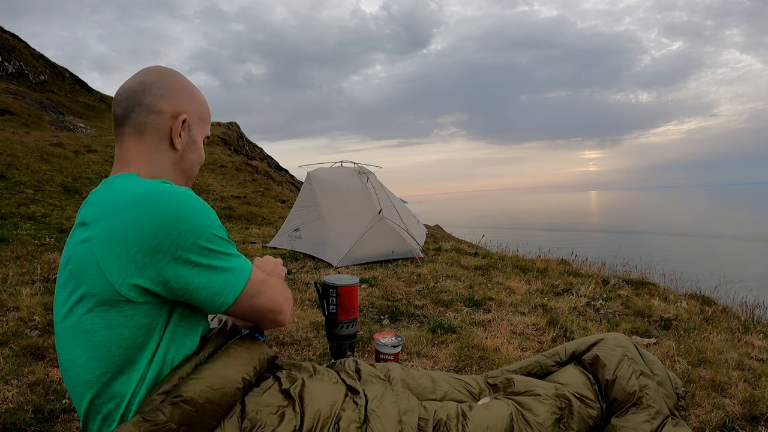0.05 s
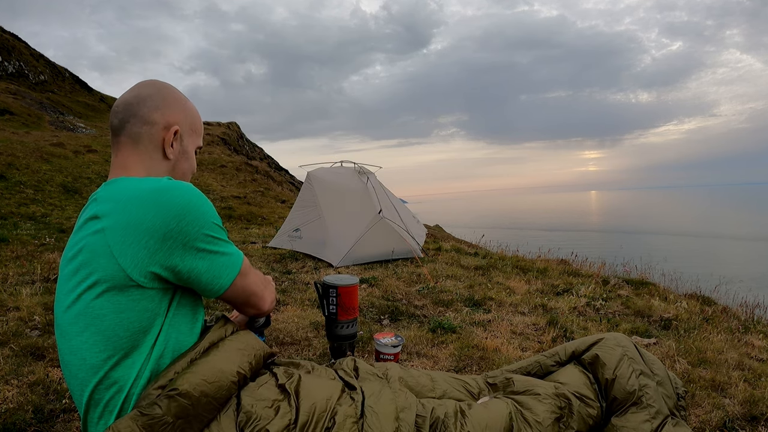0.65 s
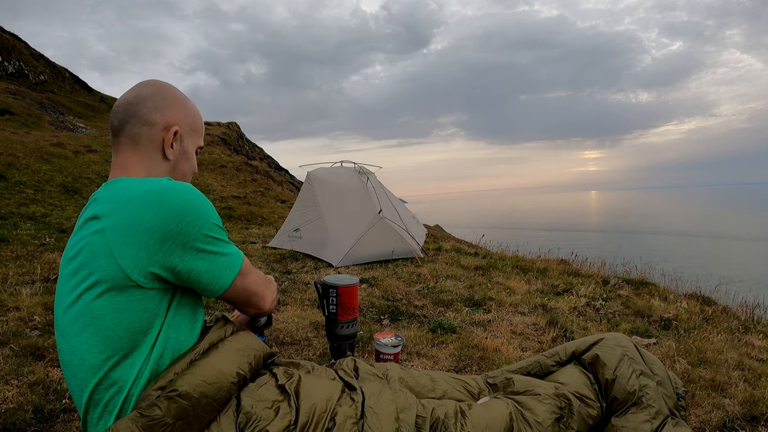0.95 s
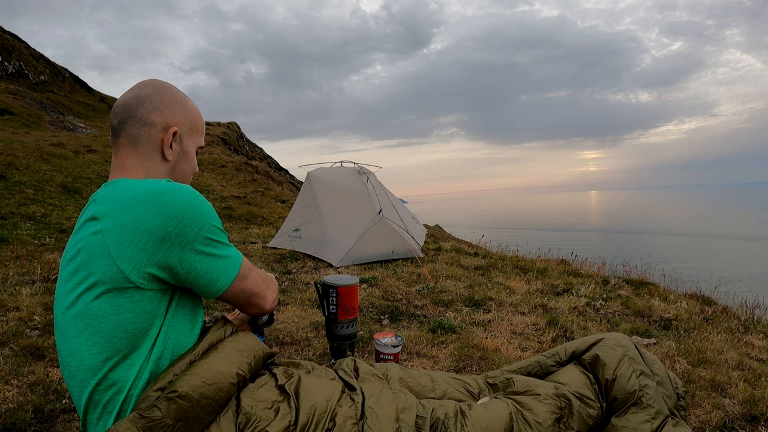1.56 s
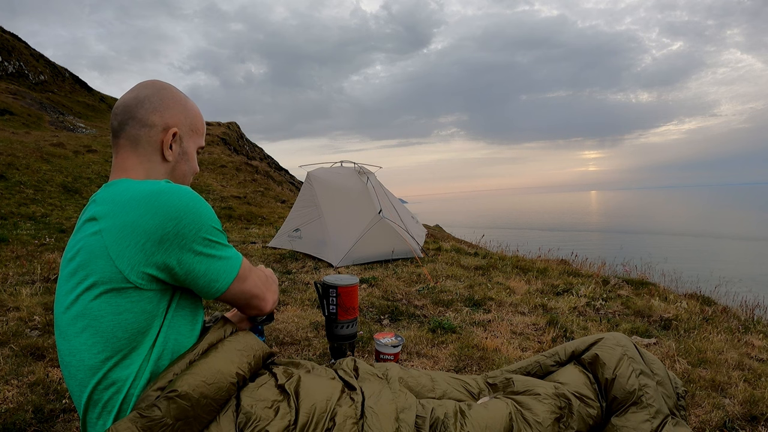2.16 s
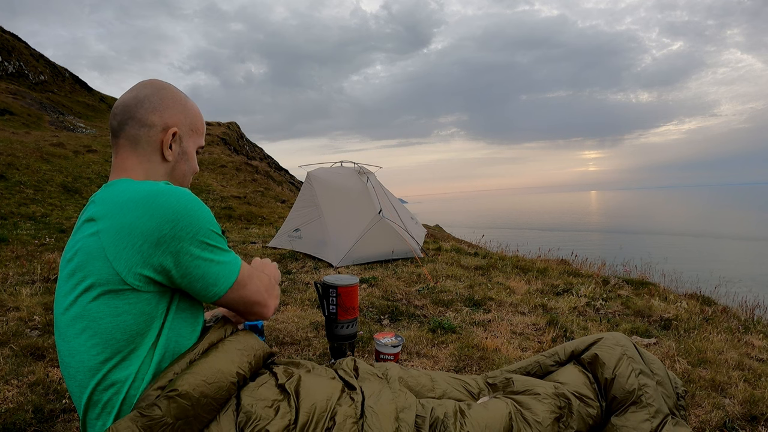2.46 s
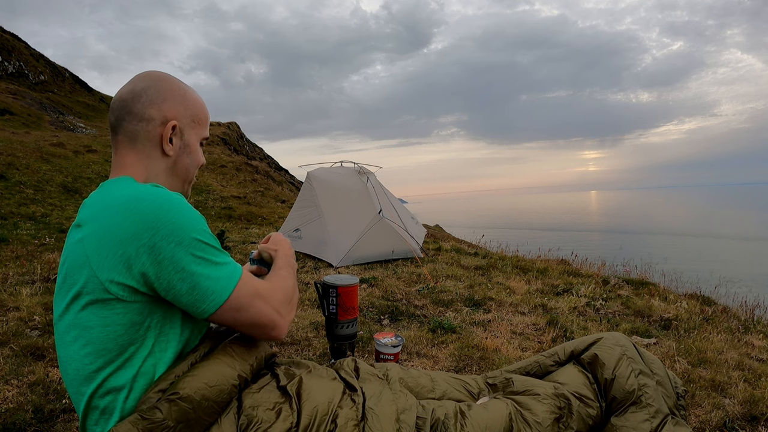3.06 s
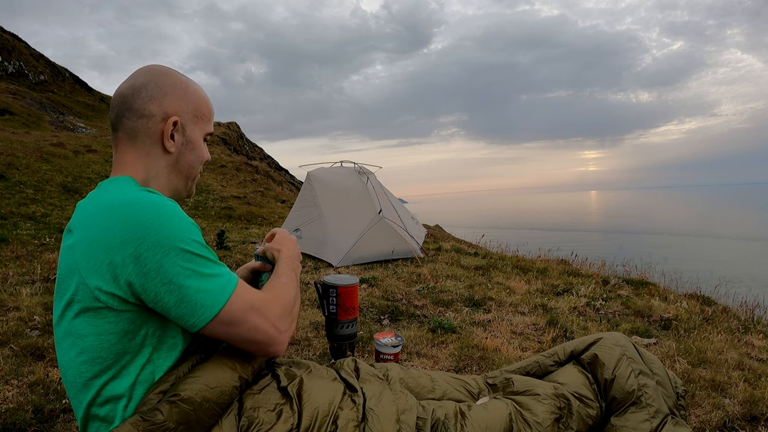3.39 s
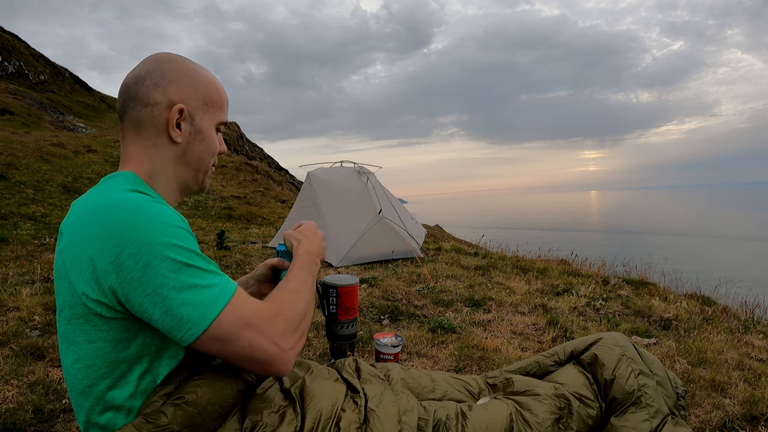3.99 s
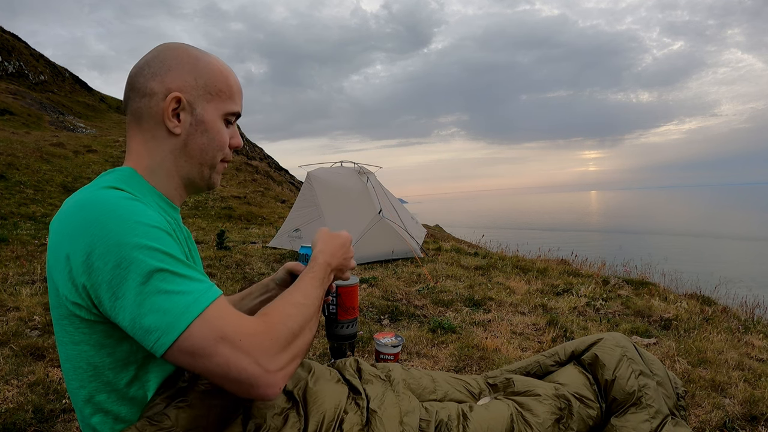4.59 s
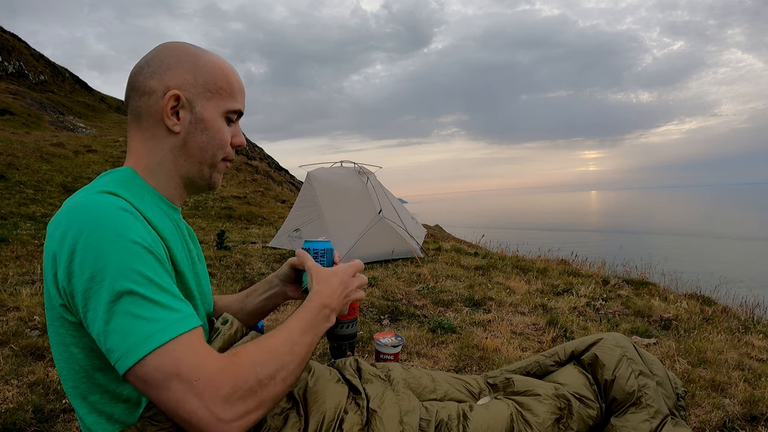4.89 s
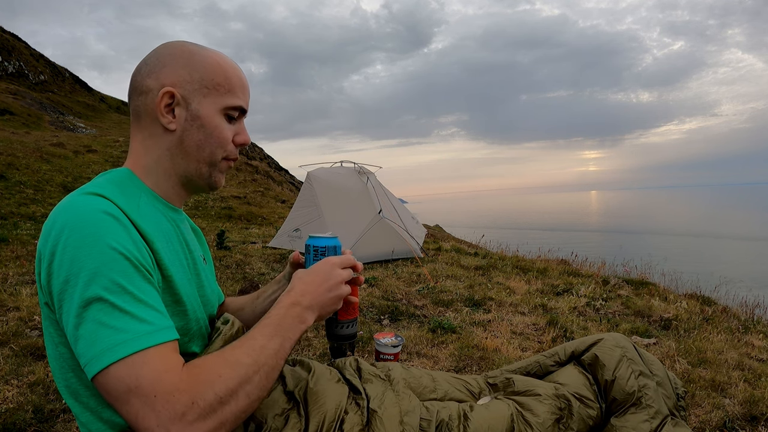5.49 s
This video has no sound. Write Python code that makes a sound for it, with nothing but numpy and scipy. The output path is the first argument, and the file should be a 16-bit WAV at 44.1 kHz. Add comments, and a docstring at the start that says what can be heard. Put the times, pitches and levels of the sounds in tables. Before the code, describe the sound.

A camping stove burns nearby on an open clifftop throughout, a soft, steady gas hiss over a low flame rumble. Wind buffets the microphone, strongest in the first half second, then easing with a few smaller gusts. At about 0.8 seconds, very close, a beer can's seal cracks sharply and gas sighs out briefly. The tab ticks faintly at 1.5 seconds. From 2.1 seconds it ticks faster with another tiny hiss, and the lid tears open in a quick, loud run of metallic cracks ending near 2.3 seconds. Fingers tap the can lightly at 2.5, 3.5 and 4.1 seconds. The thin metal snaps loudly at 4.4 seconds, followed by a faint tick and tap, then a smaller ringing snap at 5.5 seconds. In the second half, a faint, dull rush like distant surf slowly swells.

```python
"""On a clifftop, beside a burning camping stove, a beer can is opened close to the microphone.
The tab cracks the seal, gas sighs through the slit, the tab ticks under strain, the lid tears open in a
quick run, and the thin shell rings as it snaps and is tapped under the fingers. The stove's jet hisses
over its rumbling flame throughout; wind buffets the microphone and dies down as a distant rush swells."""
import sys
import numpy as np
from scipy import signal
from scipy.fft import rfft, irfft, next_fast_len
from scipy.io import wavfile
from scipy.ndimage import uniform_filter1d, map_coordinates

SR = 44100
rng = np.random.default_rng(int(sys.argv[2]) if len(sys.argv) > 2 else 0)


def waveform_to_disk(signal):
    """Save audio, clipped to [-1, 1], as 16-bit WAV at the path in sys.argv[1]."""
    frames = np.transpose(np.atleast_2d(signal))
    scaled = np.clip(frames, -1, 1) * 32767
    samples = np.round(scaled).astype(np.int16)
    wavfile.write(sys.argv[1], SR, samples)


N = 244314
TIME = np.arange(N) / SR


def amp(db):
    return 10 ** (np.asarray(db) / 20)


def unit(x):
    return x / np.sqrt(np.mean(x ** 2) + 1e-20)


def along(points, hz):
    """Interpolate (Hz, value) points on a log frequency axis."""
    pitches, values = np.transpose(points)
    return np.interp(np.log(hz + 1), np.log(pitches + 1), values)


def curves(rows):
    """One value per sample for each column after the time."""
    times, *columns = np.transpose(rows)
    return [np.interp(TIME, times, column) for column in columns]


def wobble(rate):
    """A smooth random curve with rate knots a second."""
    knots = rng.standard_normal(int(N * rate / SR) + 4)
    return map_coordinates(knots, [TIME * rate])


def filtered(x, response):
    """Pass x through a complex response of frequency."""
    size = next_fast_len(N + SR // 2)
    hz = np.fft.rfftfreq(size, 1 / SR)
    return irfft(rfft(x, size) * response(hz), size)[..., :N]


def causal(gain):
    """The response with this gain that rings only after the blow."""
    cepstrum = irfft(np.log(np.maximum(gain, 1e-6)))
    half = len(cepstrum) // 2
    return np.exp(rfft(np.r_[cepstrum[0], 2 * cepstrum[1:half], np.zeros(half)]))


def panned(x, left_db):
    """Make the left channel left_db louder than the right."""
    return x * amp([[left_db / 2], [-left_db / 2]])


def rush(gain, patchy_db):
    """Stereo noise of rms 1, coloured by gain(Hz), with patches of random strength."""
    # How alike the microphone's two sides are. Each row: frequency in Hz, correlation.
    likeness = [(60, 0.93), (130, .98), (290, 0.84), (640, 0.75), (1400, 0.9), (3100, 0.73), (5500, 1),
                (8000, .95), (12000, .65), (15000, .5)]

    def colour_and_width(hz):
        angle = np.arccos(np.clip(along(likeness, hz), -1, 1)) / 2
        return gain(hz) * np.array([np.cos(angle), np.sin(angle)])

    spectra = signal.stft(rng.standard_normal((2, N)), nperseg=512)[2]
    patches = uniform_filter1d(rng.standard_normal(spectra.shape[1:]), size=6, axis=0)
    patches = unit(uniform_filter1d(patches, size=16, axis=1))
    noise = signal.istft(spectra * amp(patchy_db * patches), nperseg=512)[1][:, :N]
    mid, side = filtered(noise, colour_and_width)
    return unit(np.array([mid + side, mid - side]))


def broad_rush(spectrum, patchy_db):
    """Noise with a broad spectrum. Each row: frequency in Hz, relative level in dB."""
    return rush(lambda hz: amp(along(spectrum, hz)), patchy_db)


def resonant_rush(modes, patchy_db):
    """Noise driving independent resonances. Each row: centre in Hz, width in Hz, relative level in dB."""
    def gain(hz):
        peaks = (amp(db) / (1 + (2 * (hz - centre) / width) ** 2) for centre, width, db in modes)
        return np.sqrt(sum(peak ** 2 for peak in peaks))
    return rush(gain, patchy_db)


def distant_rush():
    """Far off, a dull, even rush, as of surf under the cliff, slowly swells."""
    # Colour of the rush. Each row: frequency in Hz, relative level in dB.
    spectrum = [(150, -5.5), (300, 5), (450, -1.5), (650, 5.5), (900, 2), (1300, 2.5), (1800, -15),
                (3000, -64), (6000, -57)]
    swell = amp(-76 + 4 * TIME)
    return panned(swell * broad_rush(spectrum, patchy_db=0.9), left_db=-3)


def wind():
    """A dying breeze and a few bell-shaped gusts buffet the microphone, the right side a little harder."""
    # Rumble of eddies on the microphone. Each row: frequency in Hz, relative level in dB.
    spectrum = [(10, -9), (28, -0.5), (42, 0), (65, -13), (100, -13), (160, -40), (400, -70)]
    # The gusts. Each row: time of the peak in seconds, length in seconds, level in dB.
    gust_peaks = [(0.01, 0.055, -35.5), (0.16, 0.067, -28.5), (0.266, 0.03, -31), (0.732, 0.14, -36),
                  (1.27, 0.11, -41), (1.525, 0.086, -36.5), (2.987, 0.076, -43.5), (3.203, 0.12, -42),
                  (3.703, 0.049, -39)]
    breeze = amp(-44.5 - 2.5 * TIME + 1.5 * wobble(22.25))
    gusts = sum(amp(db) * np.exp(-2 * ((TIME - peak) / length) ** 2) for peak, length, db in gust_peaks)
    eddies = broad_rush(spectrum, patchy_db=4.5)
    power = np.abs(uniform_filter1d(np.mean(eddies ** 2, axis=0), size=4001))
    even_eddies = eddies / np.sqrt(power + 0.028)  # so that breeze and gusts set the strength
    return panned(np.hypot(breeze, gusts) * even_eddies, left_db=-2.8)


def stove():
    """Nearby, the gas jet hisses and rings the burner's resonances, above the low roar of the flame."""
    # Resonances of jet and mixing tube, then the burner's upper ones.
    # Each row: centre in Hz, width in Hz, relative level in dB.
    tube_modes = [(1192, 430, -13), (4300, 530, -8), (4600, 490, -8.5), (5493, 336, 1), (6004, 340, -2.5)]
    whistle_modes = [(7320, 770, 0), (8040, 960, -6.5), (9600, 570, -9), (11360, 490, -12),
                     (14200, 600, -27)]
    # Colours of jet and flame. Each row: frequency in Hz, relative level in dB.
    jet_spectrum = [(200, -27), (600, -19), (850, -33.5), (1500, -25.5), (2000, -27), (2800, -22.5),
                    (3400, -25.5), (6600, -21.5), (9000, -24), (10300, -23.5), (10850, -28), (12500, -30.5),
                    (13200, -32.5), (14400, -50), (15300, -49)]
    flame_spectrum = [(30, -33), (80, -1), (120, -3), (160, 1), (200, -2), (255, -11), (320, -11.5),
                      (430, -22), (700, -32.5), (1500, -88)]
    # The burn drifts. Each row: time in seconds, tube and flame levels in dB before their trims.
    burn_drift = [(0.0, -48, -55.5), (0.66, -48.5, -53.5), (0.99, -49, -55), (1.62, -46.5, -53.5),
                  (2.13, -46.5, -53), (2.33, -47.5, -51), (2.65, -47, -54.5), (3.87, -46.5, -50.5),
                  (4.18, -47, -51), (4.35, -50.5, -53), (5.26, -48.5, -50.5), (5.54, -51, -52)]
    # The treble drifts. Each row: time in seconds, level in dB before its trim.
    treble_drift = [(0.0, -56), (0.46, -55), (0.59, -56.5), (0.82, -57), (0.94, -56.5), (1.34, -53),
                    (1.6, -55.5), (2.17, -54), (2.31, -52.5), (2.45, -56), (2.7, -55.5), (2.87, -55.5),
                    (3.56, -54), (4.03, -51), (4.84, -55), (5.14, -52.5), (5.25, -55), (5.54, -56.5)]
    # The hiss changes colour. Each row: time in seconds, lower and upper midrange levels in dB.
    mid_drift = [(0.0, -73, -61.5), (0.7, -66, -68), (1.1, -63.5, -70), (1.6, -63, -66), (2.1, -62.5, -64),
                 (2.6, -61.5, -62), (2.95, -69, -59.5), (3.35, -75, -60), (3.9, -71, -66.5),
                 (4.3, -65, -63), (4.9, -75, -63), (5.54, -68, -65.5)]
    tube_db, flame_db = curves(burn_drift)
    treble_db, = curves(treble_drift)
    lower_db, upper_db = curves(mid_drift)
    jet_db = -53.5 + 0.5 * (treble_db - treble_db.mean())  # follows half of the treble's swing
    ring = amp(tube_db + 1.5) * resonant_rush(tube_modes, patchy_db=1)
    whistle = amp(treble_db - 0.5) * resonant_rush(whistle_modes, patchy_db=0.5)
    jet = amp(jet_db) * broad_rush(jet_spectrum, patchy_db=1)
    mids = amp(lower_db) * resonant_rush([(2020, 940, 0)], patchy_db=1.5)
    mids += amp(upper_db) * resonant_rush([(3000, 1560, 0)], patchy_db=1.5)
    flame = amp(flame_db + 3.5) * broad_rush(flame_spectrum, patchy_db=1)
    gas_flutter = amp(0.47 * wobble(20))
    hiss = gas_flutter * (ring + whistle + jet + mids)
    return panned(hiss, left_db=-0.4) + panned(flame, left_db=-1)


def escaping_gas():
    """Gas hisses through the slit in the lid and sounds the hollow head space until the lid is open."""
    # Resonances of the slit and of the gas above the beer.
    # Each row: centre in Hz, width in Hz, relative level in dB.
    slit_modes = [(1870, 1700, 1), (3820, 790, 6), (4970, 1000, 3), (6900, 2300, 6), (8400, 1200, -11),
                  (10640, 990, 3.5), (12600, 1800, -4.5)]
    head_space = [(1490, 220, 0)]
    # Each time the seal gives. Each row: start in seconds, hold in seconds, level of the hiss in dB.
    leaks = [(0.776, 0.23, -47.5), (2.135, 0.12, -53)]
    attack_s, sag_db_per_s = 0.015, 10  # the pressure sags while the slit stays open
    open_s, empty_s = 2.26, 0.02  # the flap gives way; time for the last pressure to go

    def flow(fade_db_per_s):
        total = np.zeros(N)
        for start, hold, db in leaks:
            age = TIME - start
            sag_db = sag_db_per_s * np.clip(age, 0, hold)
            fade_db = fade_db_per_s * np.maximum(age - hold, 0)
            total += np.clip(age / attack_s, 0, 1) * amp(db - sag_db - fade_db)
        return total

    pressure = np.clip(1 - (TIME - open_s) / empty_s, 0, 1)
    hiss = flow(fade_db_per_s=132) * resonant_rush(slit_modes, patchy_db=1.5)
    hollow = flow(fade_db_per_s=62) * resonant_rush(head_space, patchy_db=0)
    flutter = amp(0.97 * wobble(71.4))
    return pressure * flutter * (hiss + amp(-6.5) * hollow)


def shell_ring(force, hz, drive_db):
    """A force rings the can's aluminium wall, which hand and beer damp."""
    # Modes of the shell. Each row: centre in Hz, width in Hz, relative level in dB.
    modes = [(1160, 680, 1), (1520, 400, 5.5), (1930, 120, -1), (2740, 440, -3.5), (3280, 440, 0.5),
             (4025, 490, 5), (5230, 210, 3), (5200, 740, 0.5), (6040, 390, 1), (7090, 280, 3),
             (7700, 650, -2.5), (9250, 470, -9), (9800, 220, -3.5), (11600, 120, -9)]
    travel_s, lap_s, direct_share = 0.0004, 0.00045, 0.45
    power = sum(amp(db) ** 2 / (1 + (hz / width - centre ** 2 / (width * (hz + 1))) ** 2)
                for centre, width, db in modes)
    # Bending waves run slower at low pitch, which spreads the blow; travel_s holds at 1 kHz.
    bending = np.exp(-4j * np.pi * travel_s * np.sqrt(hz * 1000))
    # Part of the wave is heard at once; the rest circles the can a few times first.
    lap = np.exp(-2j * np.pi * hz * lap_s)
    laps = (direct_share + lap) / (1 + direct_share * lap)
    return irfft(rfft(force) * causal(np.sqrt(power) * amp(drive_db)) * bending * laps)


def buckle(level_db, touch, patch_hz, t60, crumple, second_hz=0, second_db=0,
           fall_below=0, fall_above=0, patch_db=-2):
    """A kick and a brief crumple ring the shell; the patch that gave way adds one or two notes."""
    size = 4096
    t, hz = np.arange(size) / SR, np.fft.rfftfreq(size, 1 / SR)
    fade = amp(-60 * t / t60)
    force = unit(t == 0) + crumple * unit(rng.standard_normal(size) * fade)
    # The kind of contact and the size of the patch decide which modes take the blow.
    octaves = np.log2((hz + 1) / patch_hz)
    drive_db = along(touch, hz) - np.abs(octaves) * np.where(octaves < 0, fall_below, fall_above)
    ring = shell_ring(force, hz, drive_db)
    notes = np.sin(2 * np.pi * patch_hz * t) + amp(second_db) * np.sin(2 * np.pi * second_hz * t)
    attack = (1 - np.exp(-t / 0.00061)) ** 2
    sound = unit(ring) + amp(patch_db) * unit(notes * fade * attack)
    return amp(level_db) * unit(sound) * np.sqrt(0.005 * SR / size)  # the energy of 5 ms at level_db


def finger_taps():
    """Fingers tap the wall as the grip shifts."""
    # Each row: start in seconds, level in dB.
    taps = [(2.5022, -49.5), (2.523, -42), (2.5398, -45.5), (3.5098, -44), (3.5303, -42), (4.067, -46.5),
            (4.765, -45.5), (5.4863, -41)]
    # How a fingertip drives the shell. Each row: frequency in Hz, gain in dB.
    touch = [(380, -82), (880, 19), (1800, 12), (2800, 2), (6000, -28), (15500, -23)]
    return [(start, buckle(db, touch, patch_hz=1235, t60=0.033, crumple=3.5)) for start, db in taps]


def tab_ticks():
    """The tab ticks and cracks under strain."""
    # Each row: start in seconds, level in dB, patch note in Hz, second note in Hz.
    ticks = [(1.481, -52, 1520, 2690), (2.106, -50, 1520, 2700), (2.1466, -35, 6900, 1470),
             (2.1592, -46, 1520, 7000), (2.182, -41, 1520, 6950), (2.194, -45, 1520, 7000),
             (2.199, -45, 1520, 7060), (2.2142, -20, 4840, 7050), (2.227, -36, 3820, 6700),
             (2.2416, -32.5, 3950, 4600), (2.256, -36, 6200, 4400), (3.5296, -32, 7320, 5620),
             (4.392, -36, 1600, 5460), (4.641, -50, 1250, 6900)]
    # How the tab drives the shell. Each row: frequency in Hz, gain in dB.
    touch = [(380, -11), (880, -11), (1550, -3.5), (2500, -0.5), (3200, -11.5), (4100, 1), (5500, 3.5),
             (7000, 4), (8400, -5.5), (11000, -8.5), (13000, -11), (15500, -19)]
    return [(start, buckle(db, touch, hz, t60=0.01, crumple=1, second_hz=hz2, second_db=3, patch_db=1.5))
            for start, db, hz, hz2 in ticks]


def lid_tears():
    """The flap tears along its score in jerks."""
    # Each row: start in seconds, level in dB, patch note in Hz, second note in Hz, its relative level
    # in dB, 60 dB decay time in seconds, ratio of crumple to kick.
    tears = [(2.2598, -17, 900, 1930, 1.5, 0.014, 0.51), (2.2651, -27.5, 1930, 4150, -4, 0.049, 2.9),
             (2.2715, -25.5, 2720, 5970, 0, 0.019, 2), (2.2728, -26, 1860, 4110, -15, 0.034, 2.2)]
    # How tearing drives the shell. Each row: frequency in Hz, gain in dB.
    touch = [(380, -24), (750, -1), (1000, 11), (1400, 5.5), (1950, -2), (2500, 20), (3200, -3),
             (4900, 2.5), (6000, 8.5), (9000, 3.5), (13300, 0), (15500, -10)]
    return [(start, buckle(db, touch, hz, t60, crumple, hz2, db2))
            for start, db, hz, hz2, db2, t60, crumple in tears]


def metal_snaps():
    """The thin metal snaps sharply, driving the shell mostly near the pitch of the patch that buckles."""
    # Each row: start in seconds, level in dB, patch note in Hz, second note in Hz, its relative level
    # in dB, fall of the drive below and above the patch note in dB per octave,
    # 60 dB decay time in seconds, ratio of crumple to kick.
    snaps = [(0.7808, -17, 4125, 11800, -20.5, 11, 14.5, 0.0075, 0.32),
             (4.4006, -15.5, 1936, 4070, -8, 3, -0.5, 0.0083, 0.44),
             (5.4815, -27, 1510, 2820, 4, 10, 4.5, 0.0085, 0.82),
             (5.4856, -33.5, 3000, 1790, -2, 2, 7, 0.033, 1.6)]
    # How a snap drives the shell. Each row: frequency in Hz, gain in dB.
    touch = [(380, -26), (750, -17.5), (1100, -0.5), (1500, -2.5), (2200, -2), (3100, 2), (4400, -3.5),
             (6800, -1), (8000, 1.5), (12000, -6), (14200, -5), (15500, -10)]
    return [(start, buckle(db, touch, hz, t60, crumple, hz2, db2, below, above))
            for start, db, hz, hz2, db2, below, above, t60, crumple in snaps]


def can():
    """The can close to the microphone, with a faint scatter from the body, the pot and the grass."""
    direct = np.zeros(N + SR)
    for start, sound in metal_snaps() + lid_tears() + tab_ticks() + finger_taps():
        direct[round(start * SR):][:len(sound)] += sound
    t, scatter_t60 = np.arange(SR // 10) / SR, 0.034
    tail = rng.standard_normal((2, len(t))) * amp(-60 * t / scatter_t60)
    scatter = signal.fftconvolve(direct[None], tail / np.linalg.norm(tail[0]), axes=1)[:, :N]
    return panned(direct[:N], left_db=1) + amp(-15) * scatter


def scene():
    """The clifftop at the microphone, whose right side hears everything slightly first."""
    right_lead_s = 1.3e-5
    delays = right_lead_s * np.array([[0.5], [-0.5]])
    mix = can() + escaping_gas() + stove() + wind() + distant_rush()
    return filtered(mix, lambda hz: np.exp(-2j * np.pi * hz * delays))


def record(dry):
    """The recorder keeps nothing above its band limit."""
    top_hz, edge_hz = 15800, 700
    return filtered(dry, lambda hz: np.clip((top_hz - hz) / edge_hz, 0, 1))


dry = scene()
out = record(dry)
waveform_to_disk(out)
```